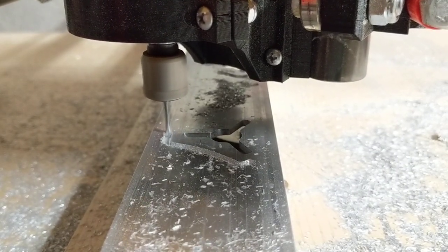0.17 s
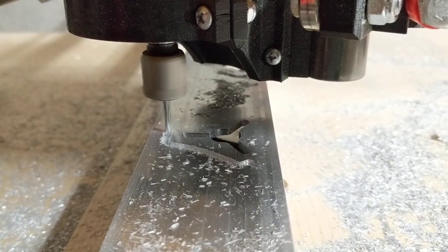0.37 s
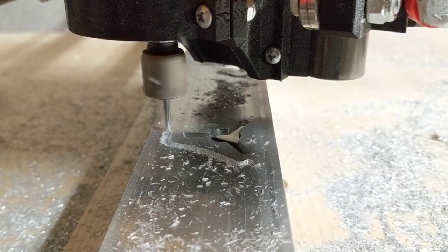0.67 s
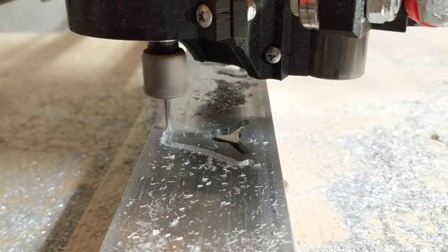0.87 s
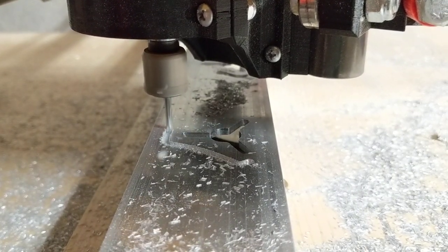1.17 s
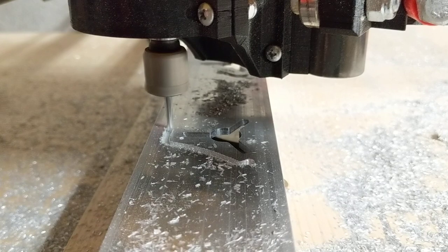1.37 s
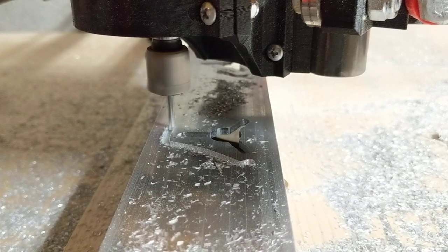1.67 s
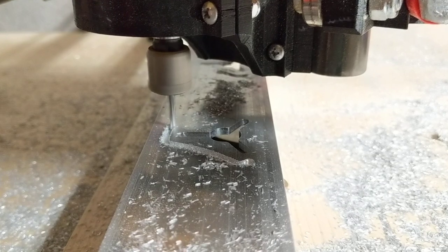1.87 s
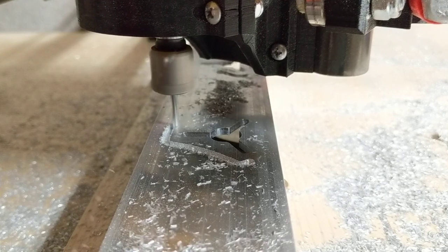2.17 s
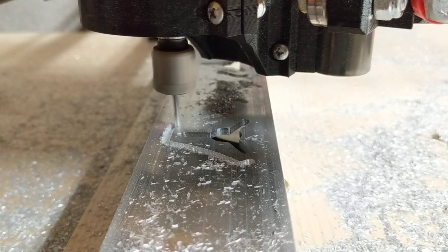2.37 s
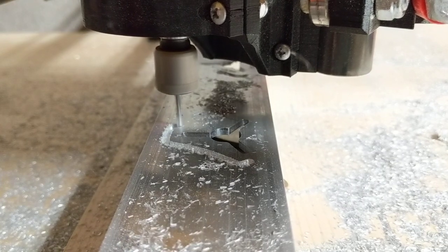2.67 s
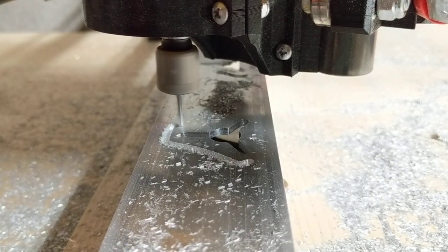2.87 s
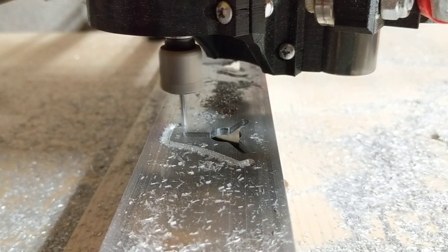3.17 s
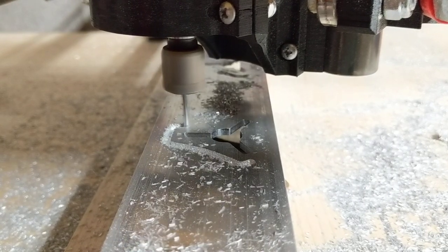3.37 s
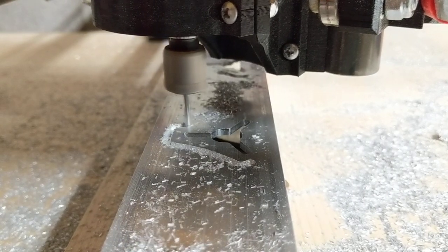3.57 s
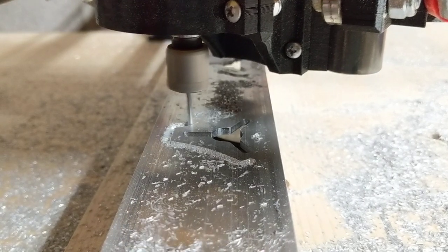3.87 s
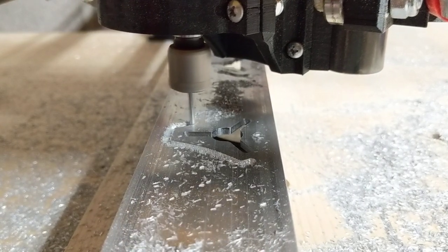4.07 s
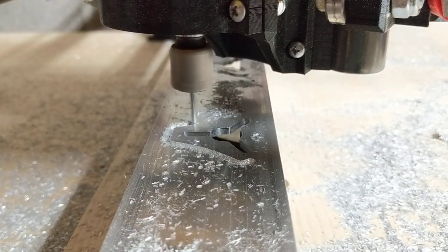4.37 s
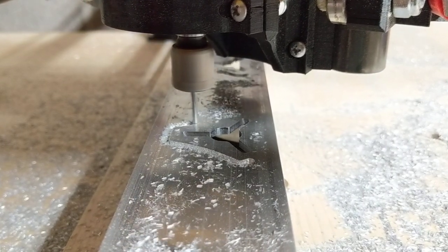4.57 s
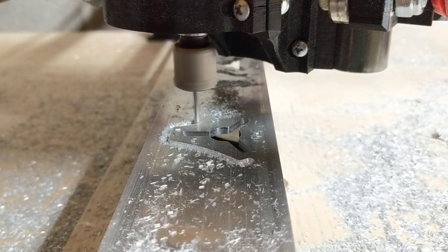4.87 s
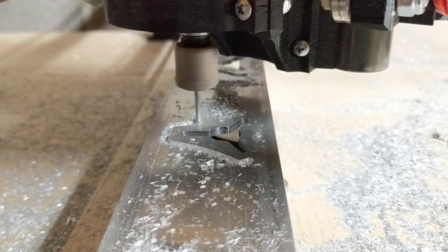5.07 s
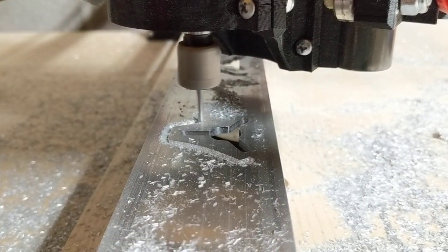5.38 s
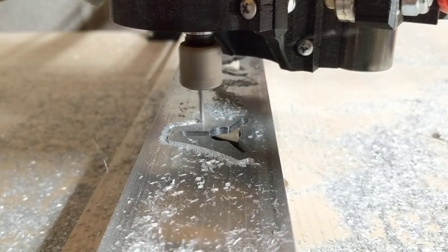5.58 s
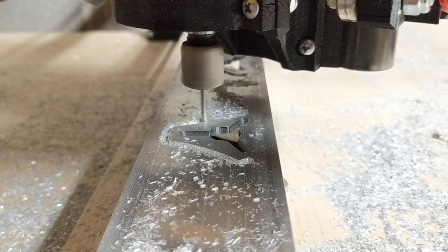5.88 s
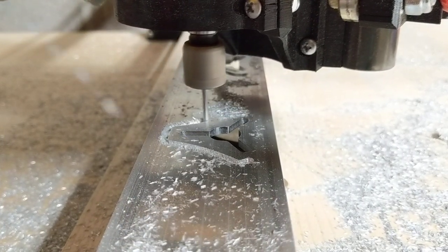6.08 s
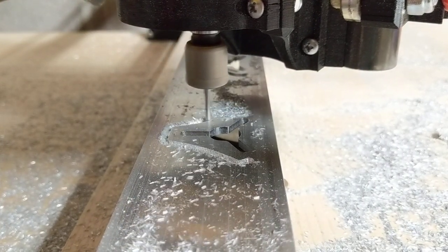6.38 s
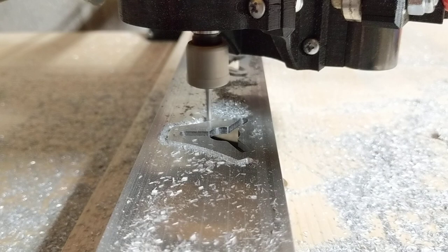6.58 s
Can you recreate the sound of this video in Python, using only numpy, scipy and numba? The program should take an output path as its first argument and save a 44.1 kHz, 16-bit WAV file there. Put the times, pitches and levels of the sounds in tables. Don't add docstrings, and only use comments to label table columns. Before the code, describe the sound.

A small router spindle mills aluminium very close to a mono microphone in a workshop, already running at the start and never stopping. From 0 to 1.4 seconds the cut is light: a steady whine around 420 hertz with bright overtones, and a thin piercing ring near 7.7 kilohertz that flares in short irregular bursts, thickest between 1 and 1.65 seconds. Cooling air roars softly and cut chips hiss. From about 1.5 to 2.3 seconds the cutter bites; the pitch sags slightly, by less than a semitone, and a rough, wavering metallic chatter spreads around the squeal. Around 3.3 seconds it goes deeper, settling near 409 hertz, with a harsher, grainy, buzzing scream. It holds almost steady until the end at 6.7 seconds, over air, hiss and very faint table rumble, slightly saturated and cut off while still running.

```python
import sys
import numpy as np
from scipy import signal
from scipy.io import wavfile
from scipy.ndimage import uniform_filter1d
from numba import njit

SR = 44100
rng = np.random.default_rng(int(sys.argv[2]) if len(sys.argv) > 2 else 0)


def voltage_ratio(decibels):
    exponent = np.asarray(decibels, float) / 20
    return 10 ** exponent


def master(y):
    cut = np.clip(np.atleast_2d(y).T, -1, 1)
    pcm = np.round(cut * 32767)
    wavfile.write(sys.argv[1], SR, pcm.astype(np.int16))


N = 296793

# t/s, f/Hz
SHAFT_SPEED = [(0, 423.6), (0.5, 422.9), (1.45, 422.6), (1.65, 421.2), (2.0, 416.2), (2.3, 412.8),
               (3.0, 412.0), (3.25, 410.2), (3.6, 409.5), (3.88, 409.4), (4.08, 408.5), (4.85, 409.2),
               (5.15, 408.0), (5.6, 408.8), (6.73, 408.5)]
# t/s, stage/1 (0 light, 1 biting, 2 deep)
CUT_STAGE = [
    (0, 0.018),
    (1.4, 0.09),
    (1.65, 0.24),
    (1.85, 0.61),
    (2.05, 1.2),
    (2.4, 1.1),
    (2.9, 0.92),
    (3.3, 1.78),
    (3.8, 1.94),
    (6.73, 2),
]
# f/Hz, unbalance hum level/dB, two-flute tone level/dB
FRAME_RESPONSE = [(408, -43, -23.5), (409.8, -36, -23.5), (412.85, -42, -24.5), (413.3, -31, -26),
                  (416.3, -25, -29), (419.3, -24, -29), (421.5, -25, -25), (422.9, -27, -26),
                  (423.6, -32, -26.5)]
# stage/1, air roar level/dB, chip hiss level/dB, table rumble level/dB
BACKGROUND = [(0, -21.5, -24, -44.5), (1, -22, -22.5, -39.5), (2, -24, -24.5, -41.5)]
# order/1, light level/dB, deep level/dB
SHAFT_ORDERS = [(3, -29, -32), (4, -33, -33), (5, -36, -50), (6, -38, -42), (7, -44, -47), (8, -50, -54),
                (9, -49, -52), (10, -62, -57), (12, -36, -44), (13, -29, -33), (14, -36, -43),
                (15, -40, -38), (16, -30, -42), (17, -32, -34), (18, -21, -27), (19, -34, -26),
                (20, -39, -37), (21, -32, -47), (22, -36, -48), (26, -40, -44), (32, -50, -52)]
# nearest order/1, light level/dB, biting level/dB, deep level/dB
CHATTER_LINES = [(1, -41, -38, -41), (3, -37, -38, -41), (4, -36, -39, -46), (5, -38, -31, -34),
                 (6, -32, -42, -51), (9, -44, -42, -43), (12, -39, -42, -43), (13, -40, -39, -38),
                 (14, -32, -35, -37), (15, -37, -30, -31), (16, -29, -33, -35), (17, -25, -30, -30),
                 (18, -21, -24.5, -21), (19, -28.5, -14, -16), (20, -29, -23, -22), (21, -31, -31, -33),
                 (22, -26, -27, -37), (23, -31, -29, -26), (24, -39, -36, -35), (25, -48, -42, -42),
                 (26, -41, -41, -49), (27, -53, -47, -47), (28, -46, -48, -50), (29, -51, -49, -44),
                 (32, -41, -50, -44), (33, -53, -42, -45), (35, -52, -50, -47), (36, -46, -54, -52),
                 (37, -49, -44, -38), (38, -60, -39, -40)]
# t/s, level/dB
RING_FLARES = [(0.02, 7.5), (0.19, -1), (0.27, 3), (0.32, -4), (0.35, 4.5), (0.64, 5.0), (1.03, 2.5),
               (1.13, 5.0), (1.22, 4.5), (1.31, 4), (1.4, 5.5), (1.44, 6), (1.5, 7), (1.54, -2),
               (1.65, 5.5), (1.83, 3), (2.85, 3.0), (3.3, 0), (3.34, 3.5), (3.97, -2.2), (5.18, 3.5),
               (5.21, -3)]
# f/Hz, level/dB per Hz
HISS_LIGHT = [(4200, -21), (4900, -8), (5300, -6), (6300, -0.5), (6600, -16), (6950, 2.5), (7450, 2),
              (7850, -19), (8200, -12), (8650, -14), (9000, -11), (9800, -10), (10300, -17)]
# f/Hz, level/dB per Hz
HISS_DEEP = [(4200, -20.5), (5000, -9), (5500, -8), (6000, -1), (6700, -10), (7000, 0), (7550, 1.5),
             (7950, -12), (8300, -14), (8800, -13), (9200, -8), (10000, -12.5), (10400, -17.5)]
# f/Hz, level/dB per Hz
HISS_TOP = [(11500, -16.5), (13000, -16), (13900, -15), (14200, -24), (14600, -22), (15500, -19),
            (16500, -24)]
# f/Hz, level/dB per Hz
AIR_SPECTRUM = [(250, -29), (330, -28), (520, -23.5), (700, -9), (900, -8), (1100, -12), (1350, -12.5),
                (1650, -9.5), (2300, -9), (2700, -13), (3100, -18), (4100, -20), (4600, -23)]
# f/Hz, width/Hz, level/dB
HOUSING_MODES = [(440, 58, 9.5), (690, 39, 0.5), (981, 59, 5.5), (1727, 130, 4), (2080, 140, 0),
                 (2344, 56, -10), (2320, 150, 1)]
# f/Hz, level/dB per Hz
RUMBLE_SPECTRUM = [(12, -11), (35, -26), (60, -3), (130, -3.5), (200, 1), (300, -3), (420, -4)]

HOP = 100
TIME_S = np.arange(N // HOP + 2) * HOP / SR
TOP_ORDER = 38


def evened(x):
    return x / np.sqrt(np.mean(abs(x) ** 2) + 1e-20)


def curves(rows, along=TIME_S):
    s, *columns = np.transpose(rows)
    return [np.interp(along, s, column) for column in columns]


def smooth(control):
    return np.interp(np.arange(N) / SR, TIME_S, control)


def wander(hz):
    z = rng.standard_normal(len(TIME_S)) + 1j * rng.standard_normal(len(TIME_S))
    f = np.fft.fftfreq(len(TIME_S), HOP / SR)
    return evened(np.fft.ifft(np.fft.fft(z) / (1 + (f / hz) ** 2)))


@njit
def orders(heights, turns, hop):
    out = np.zeros(len(turns), np.complex128)
    for n in range(len(turns)):
        i, part = n // hop, n % hop / hop
        spin = np.exp(2j * np.pi * turns[n])
        z = spin
        for k in range(heights.shape[1]):
            out[n] += ((1 - part) * heights[i, k] + part * heights[i + 1, k]) * z
            z *= spin
    return out


def read(points, hz):
    f, value = np.transpose(points)
    return np.interp(np.log(hz + 1), np.log(f + 1), value, left=-90, right=-90)


def noise(shape_db, patchy_db):
    frames, hz = N // 256 + 5, np.fft.rfftfreq(1024, 1 / SR)
    t = np.arange(frames) * 256 / SR
    a, b, patches = rng.standard_normal((frames, 513, 3)).T
    patches = uniform_filter1d(patches, size=10, axis=0)
    patches = evened(uniform_filter1d(patches, size=12, axis=1))
    level_db = shape_db(hz[:, None], t) + patchy_db * patches
    z = (a + 1j * b) * voltage_ratio(level_db)
    return evened(signal.istft(z, nperseg=1024, noverlap=768)[1][:N])


def surge(k, stage):
    flare_s, lull_db = 0.02, -2
    surge_db = sum(db * np.exp(-.5 * ((TIME_S - s) / flare_s) ** 2) for s, db in RING_FLARES)
    surge_db = surge_db + lull_db * np.clip(1 - stage, 0, 1)
    return surge_db * 1.14 / (1 + ((k - 18.3) / 0.96) ** 2)


def shaft(turns, speed_hz, stage):
    hum_db, flute_db = curves(FRAME_RESPONSE, speed_hz)
    deep = np.clip(stage / 2.55, 0, 1)
    lines = [(1, hum_db - 1.5 * deep), (2, flute_db + 0.83)]
    lines += [(k, light + (full - light) * deep) for k, light, full in SHAFT_ORDERS]
    heights = np.zeros((len(TIME_S), TOP_ORDER), complex)
    for k, db in lines:
        waver = 1 + (0.1 + 0.019 * k) * wander(hz=17)
        pull_hz = 6 * (16 <= k <= 22)
        phase = np.exp(2j * np.pi * (rng.random() - pull_hz * TIME_S))
        heights[:, k - 1] = voltage_ratio(db + surge(k, stage)) * waver * phase
    return voltage_ratio(4.0) * orders(heights, turns, HOP).real


def chatter(turns, offset_hz, stage):
    load = np.sqrt(2) * wander(hz=32).real
    sag = load + .25 * (load ** 2 - 1)
    slip = np.cumsum(smooth(offset_hz - (17 - 2.5 * stage) * sag)) / SR
    heights = np.zeros((len(TIME_S), TOP_ORDER), complex)
    for k, *levels in CHATTER_LINES:
        db = np.interp(stage, range(3), levels) + surge(k, stage)
        db -= (.9 if k <= 19 else .1) * sag
        echo = 0.059 + 0.16 * min(abs(k - 19.6), 14)
        fading = (1 + echo * wander(hz=27.7)) / np.sqrt(1 + echo ** 2)
        lag = .06 * (k - 19) ** 2
        if 6 <= k <= 11:
            lag = lag + np.cumsum(12 - offset_hz) * HOP / SR
        heights[:, k - 1] = voltage_ratio(db) * fading * np.exp(2j * np.pi * lag)
    ring = orders(heights, turns, HOP) * np.exp(2j * np.pi * slip)
    return voltage_ratio(3.5) * ring.real


def chips(turns, level_db):
    def shape_db(hz, t):
        deep = np.clip(np.interp(t, *np.transpose(CUT_STAGE)), 0, 1)
        return (1 - deep) * read(HISS_LIGHT + HISS_TOP, hz) + deep * read(HISS_DEEP + HISS_TOP, hz)
    bite = 1 + 0.34 * np.cos(2 * np.pi * turns)
    return smooth(voltage_ratio(level_db + 4)) * bite * noise(shape_db, patchy_db=2.0)


def roar(level_db):
    def shape_db(hz, t):
        modes_db = sum(db / (1 + (2 * (hz - f) / w) ** 2) for f, w, db in HOUSING_MODES)
        return read(AIR_SPECTRUM, hz) + modes_db + 0 * t
    return smooth(voltage_ratio(level_db + 1.5)) * noise(shape_db, patchy_db=0.53)


def rumble(level_db):
    def shape_db(hz, t):
        return read(RUMBLE_SPECTRUM, hz) + 0 * t
    return smooth(voltage_ratio(level_db - 1.0)) * noise(shape_db, patchy_db=1.5)


def scene():
    speed_hz, = curves(SHAFT_SPEED)
    stage, = curves(CUT_STAGE)
    turns = np.cumsum(smooth(speed_hz + 0.2514 * wander(hz=11.4).real)) / SR
    offset_hz = np.interp(stage, range(3), [-50, -33, -27])
    offset_hz = offset_hz + 5 * np.sqrt(2) * wander(hz=2.508).real
    recede_from_s, recede_db_per_s = 2.86, 0.02
    away_db = -recede_db_per_s * np.maximum(TIME_S - recede_from_s, 0)
    roar_db, hiss_db, rumble_db = np.array(curves(BACKGROUND, stage)) + away_db
    mono = shaft(turns, speed_hz, stage) + chatter(turns, offset_hz, stage)
    mono += chips(turns, hiss_db) + roar(roar_db) + rumble(rumble_db)
    return np.array([mono, mono])


def band_limit(x):
    return signal.sosfilt(signal.butter(12, 15950, fs=SR, output="sos"), x)


def record(dry):
    ceiling = .89
    loud = ceiling * np.tanh(voltage_ratio(0.75) * dry / ceiling)
    edge = signal.firwin(801, 15770, window=("kaiser", 9), fs=SR)
    mix = signal.oaconvolve(loud, edge[None], "same")
    return band_limit(mix)


dry = scene()
out = record(dry)
master(out)
```